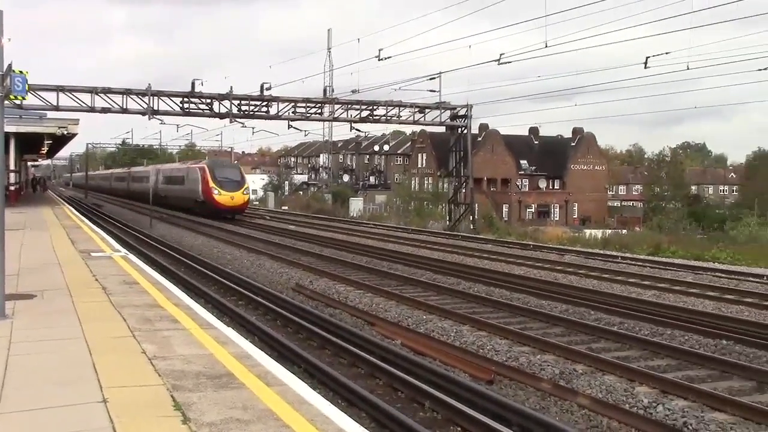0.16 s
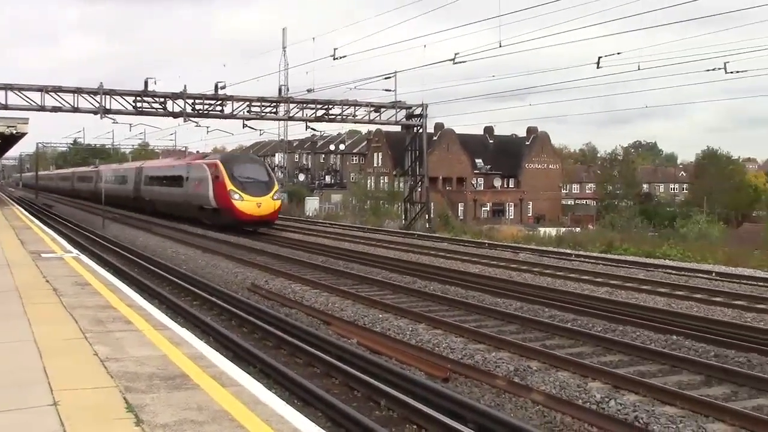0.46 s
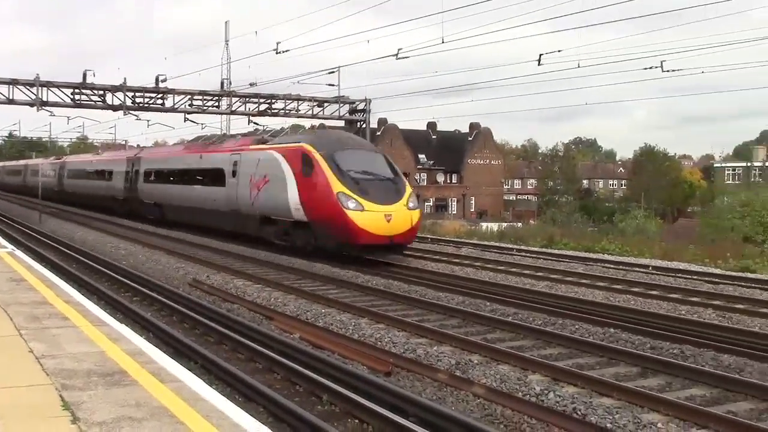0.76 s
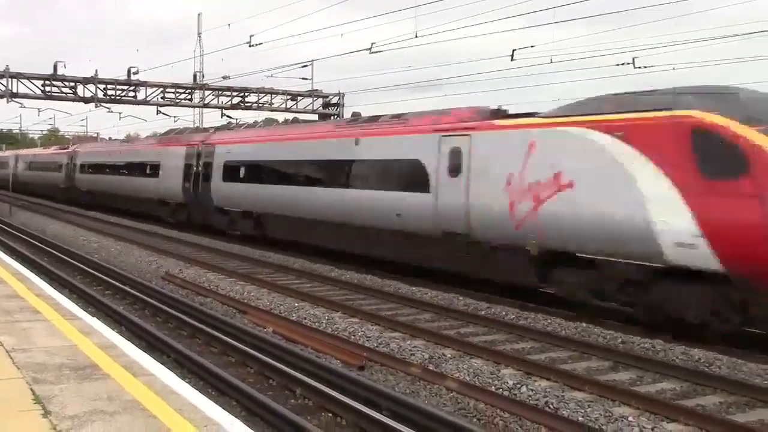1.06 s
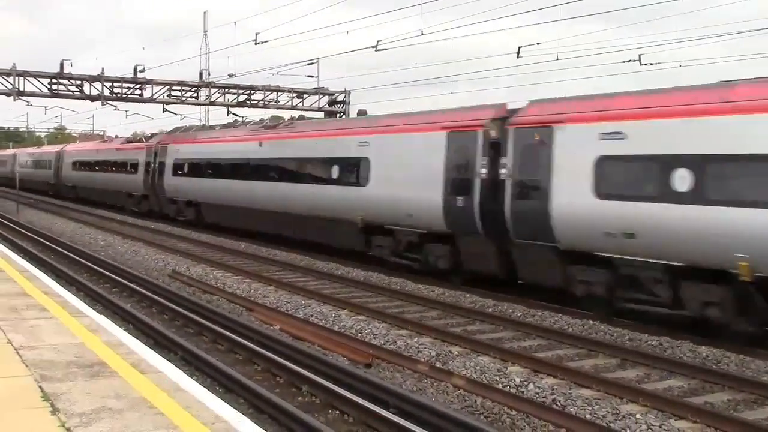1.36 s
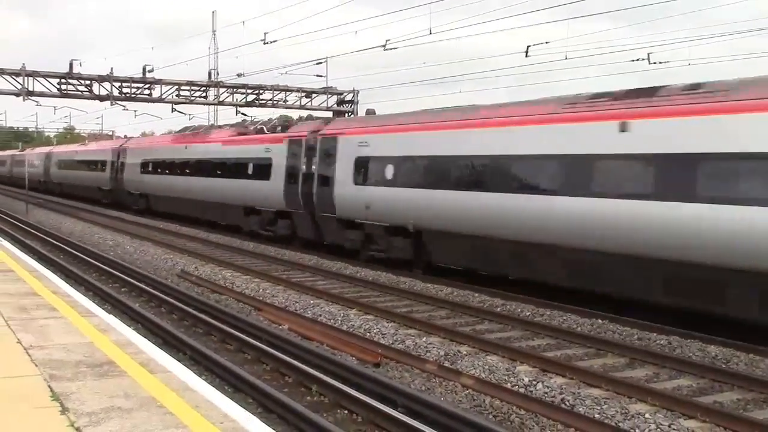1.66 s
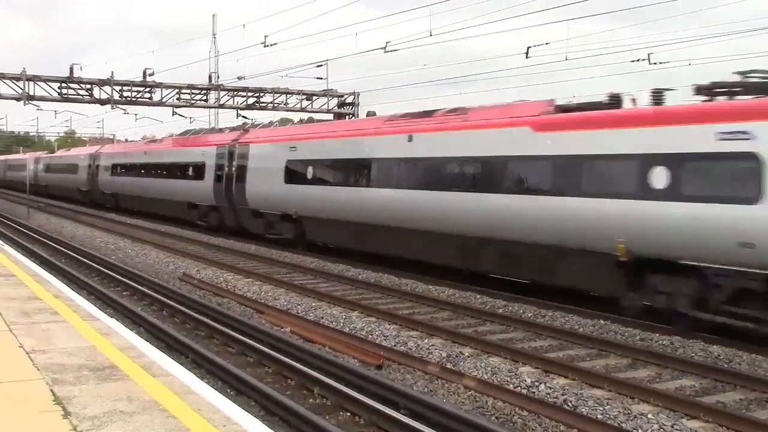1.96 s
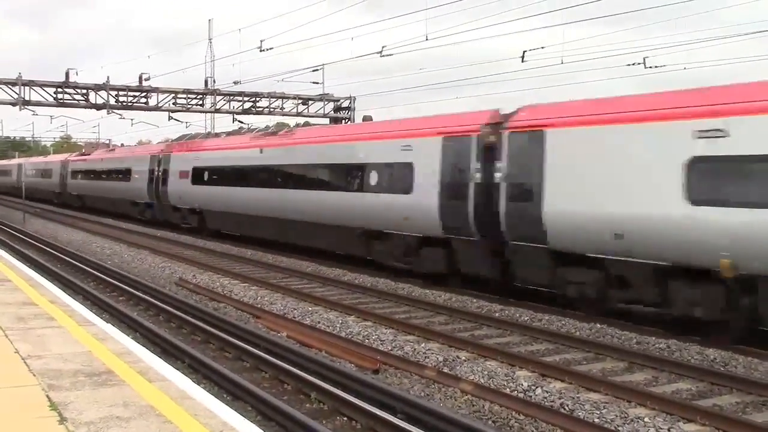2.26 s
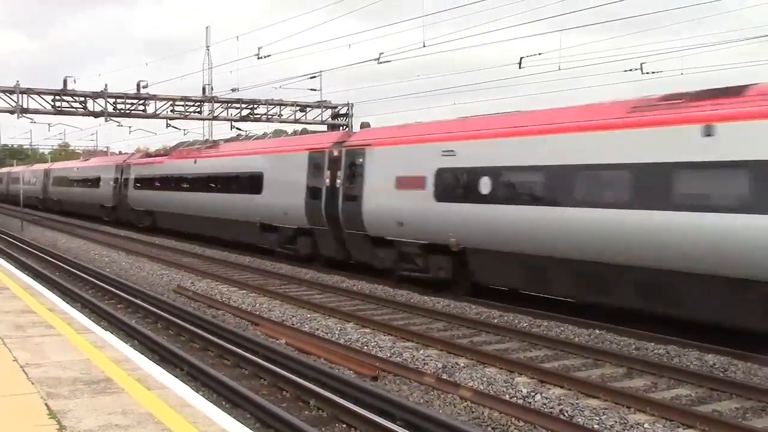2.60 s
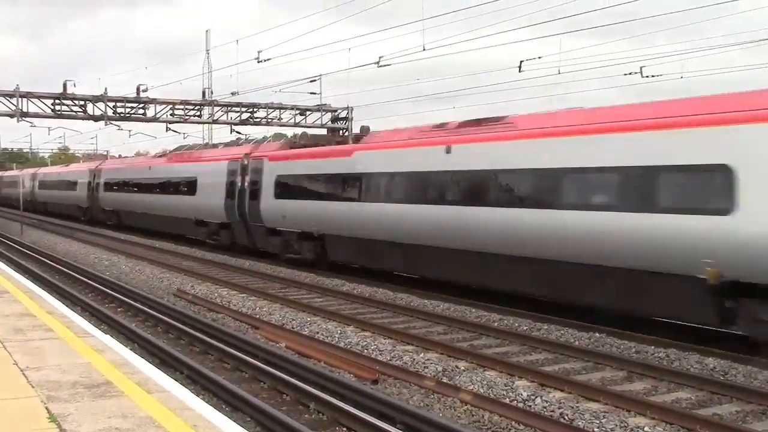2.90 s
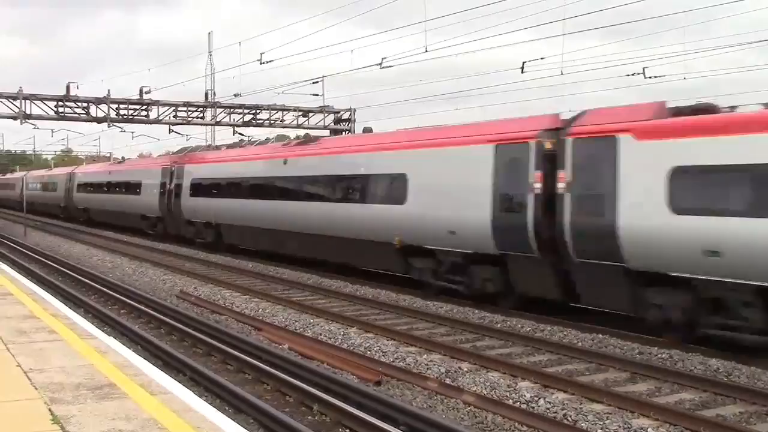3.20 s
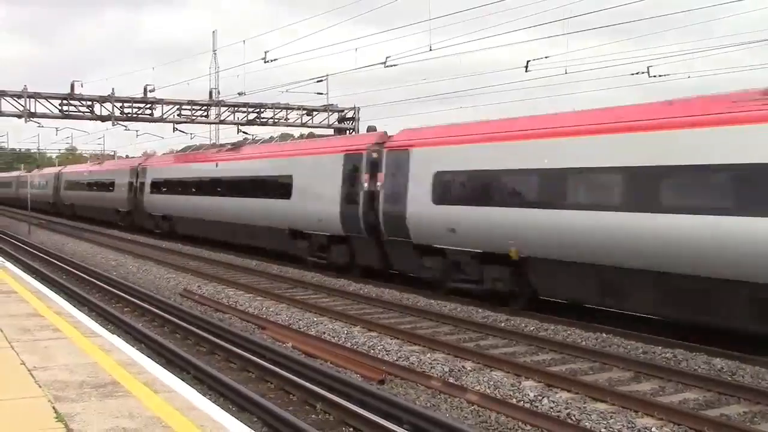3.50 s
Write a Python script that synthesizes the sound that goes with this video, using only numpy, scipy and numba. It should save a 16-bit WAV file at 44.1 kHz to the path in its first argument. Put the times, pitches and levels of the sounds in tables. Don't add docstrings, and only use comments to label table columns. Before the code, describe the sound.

Fast electric train rushes close past a station platform, rails ringing ahead, wheels singing and hissing

```python
import sys
import numpy as np
from scipy import signal
from scipy.fft import rfft, irfft
from scipy.io import wavfile
from scipy.ndimage import uniform_filter1d, minimum_filter1d
from numba import njit

SR = 44100
rng = np.random.default_rng(int(sys.argv[2]) if len(sys.argv) > 2 else 0)


def boost_factor(decibels):
    exponent = np.asarray(decibels, float) / 20
    return 10 ** exponent


def to_wav(s):
    ch = np.atleast_2d(s).T
    pcm = np.round(np.clip(ch, -1, 1) * 32767)
    wavfile.write(sys.argv[1], SR, pcm.astype(np.int16))


N = 160965

# pitch in Hz, level in dB, width in Hz, end in seconds.
SQUEAL = (6662, -36.5, 219, .3)
# pitch in Hz, level in dB, width in Hz.
RAIL_AHEAD = [(2536, -32, 24), (2824, -22.5, 200), (1884, -22, 200), (986, -22, 230), (1600, -26, 140),
              (246, -30.5, 123)]
# pitch in Hz, level in dB, width in Hz.
RAIL_HIGH = [(10207, -60, 70), (11150, -64, 40), (12091, -60, 25), (13010, -60, 25)]
# pitch in Hz, level in dB, width in Hz.
RAIL_UNDER = [(950, -29, 22), (1883, -22.5, 12.5), (1704, -30, 15), (233.6, -38.5, 32), (289, -40.5, 49)]
# frequency in Hz, density in dB per Hz.
AIR = [(30, -39.5), (280, -4.5), (420, -9), (900, -1.5), (1500, -5.5), (3300, -9), (5000, -21), (7000, -16),
       (15000, -34)]
# time abreast in seconds, pitch in Hz, level in dB, width in Hz,
# loss along the track ahead in dB, loss behind in dB.
WHISTLES = [
    (1.24, 5880, -35, 90, -7, 80),
    (1.68, 6170, -29.5, 90, 900, 194),
    (1.84, 4300, -30, 90, 298, 40),
    (2.17, 4170, -35, 120, 502, 50),
]
# time abreast in seconds, levels of overtones 1, 2 and 3 in dB, level of hiss in dB.
BOGIES = [(1.30, -12, -3.5, 1, -17), (1.615, -6.5, -3.5, 1, 4.5), (1.755, -4, -1.5, -0.5, 5),
          (2.065, -2.5, -2, 5, 1), (2.20, -5, -1, 1, -4), (2.535, 2.5, 0.5, 3.5, 0),
          (2.67, -1.5, -6.5, -2, -14), (2.955, 0.5, -2, -2, -2), (3.11, -7, -5, 4.5, -20),
          (3.395, 1, -2, 4, 3), (3.535, 0.5, -0.5, 3.5, -2), (3.85, 2.5, -21, -18, 7.5),
          (3.99, 5.5, -26, 7, 8), (4.30, 6, -26, 4, 5), (4.44, -7, -1, -1, 5)]
# level in dB, width in Hz, halo level in dB, halo width in Hz,
# loss along the track ahead in dB, loss behind in dB.
SONG = [
    (-26.5, 45, -27, 300, -2.5, 2.5),
    (-25.5, 31.4, -21, 145, 1, -0.5),
    (-20.5, 46, -24.5, 510, 11, 22),
]
# frequency in Hz, density in dB per Hz.
ROAR = [(30, -43.5), (230, -9), (420, -15), (950, -8), (1350, -17.5), (3000, -8.5), (5200, -30),
        (6800, -28), (15000, -44)]
# frequency in Hz, density in dB per Hz.
HISS = [(2500, -32), (4000, -6), (5300, -4), (6800, 1.5), (10000, -12), (13000, -18), (15000, -14)]
# frequency in Hz, share in dB.
SPREAD_EARLY = [(400, -43), (2000, -15.5), (3300, -22), (5500, -37), (7000, -8), (8700, -16), (11000, 0),
                (15000, -7)]
SPREAD_LATE = [(400, -29.5), (2000, -11.5), (4000, -12), (5000, -10), (6500, -7.5), (8700, -19),
               (11000, -1), (15000, -11)]
# time in seconds, gain in dB.
GAIN = [(0, 0.5), (.45, 0), (.9, -1), (1.3, 2.5), (1.8, -2), (2.3, -1), (2.8, -2), (3.2, -2.5),
        (3.36, -8.5), (3.65, -11.5)]
# frequency in Hz, response in dB.
MIC_TOP = [(10000, 0), (13000, -2), (15000, -5)]

SPEED_M_S, TRACK_M, AXLES_M = 45.5, 8.3, 2.6
SOUND_M_S = 343
AHEAD_ENDS_S = 1.126
NOSE_S, AIR_REACH_M = 1.0, 11
AIR_DB, AIR_FLICKER_DB = -11.5, 1.84
RIPPLE_HZ, REAR_AXLE_DB, SONG_FLUTTER_DB = 914.1, -4.5, 2.5
ROAR_DB, ROAR_FLICKER_DB = -14.5, 1.56
HISS_DB, HISS_FLICKER_DB = -34, 1.5
PAN_DB, PORT_LAG_DB, SIDE_LOW_HZ = 4, -15, 505
AIM = 0.95
WIDENS_S = 1.09
RUMBLE_CUT_HZ = 28


@njit
def svf(x, hz, width):
    y, b, l = np.empty(len(x)), 0., 0.
    for i in range(len(x)):
        g, k = np.tan(np.pi * hz[i] / SR), width / hz[i]
        v = (b + g * (x[i] - l)) / (1 + g * (g + k))
        b, l, y[i] = 2 * v - b, l + 2 * g * v, k * v
    return y


def unit(x):
    return x / np.sqrt(np.mean(x ** 2))


def band(hz, width_hz):
    hz = hz + np.zeros(N)
    once = svf(rng.standard_normal(N), hz, 1. * width_hz)
    return unit(svf(once, hz, 1. * width_hz))


def walk(rate):
    hold = int(SR / rate)
    steps = np.repeat(rng.standard_normal(N // hold + 1), hold)
    return 1.37 * uniform_filter1d(uniform_filter1d(steps, hold), hold)[:N]


def fade(at_s, over_s):
    return 1 / (1 + np.exp((np.arange(N) / SR - at_s) / over_s))


def response(f, shape):
    hz, db = np.transpose(shape)
    return boost_factor(np.interp(np.log(f), np.log(hz), db))


def shaped(x, shape):
    f = np.fft.rfftfreq(N, 1 / SR) + 1
    return irfft(rfft(x) * response(f, shape), N)


def coloured(shape, flicker_db):
    f = np.fft.rfftfreq(N, 1 / SR) + 1
    spec = rfft(rng.standard_normal(N)) * response(f, shape)
    sway = walk(4.95)
    place = 2 * np.log2(np.clip(f, 20, 20480) / 20)
    out = 0
    for k in range(21):
        flicker = boost_factor(flicker_db * (walk(8.954) + 0.52 * sway))
        out = out + flicker * irfft(spec * np.clip(1 - abs(place - k), 0, 1), N)
    return unit(out)


def passing(abreast_s, reach_m=TRACK_M):
    along = SPEED_M_S * (np.arange(N) / SR - abreast_s)
    bearing = along / np.hypot(along, reach_m)
    doppler = 1 / (1 + bearing * SPEED_M_S / SOUND_M_S)
    return doppler, np.sqrt(1 - bearing ** 2), bearing


def beam(bearing, ahead_db, behind_db):
    return boost_factor(-np.where(bearing < 0, ahead_db * bearing ** 6, behind_db * bearing ** 2))


def rail_squeal():
    hz, db, wide, ends_s = SQUEAL
    return boost_factor(db) * band(hz, wide) * fade(ends_s, 0.023)


def rails_ahead():
    _, nose, _ = passing(NOSE_S, AIR_REACH_M)
    swell = sum(boost_factor(db + 5.5 + 1.8 * walk(7.6)) * band(hz, wide) for hz, db, wide in RAIL_AHEAD)
    high = sum(boost_factor(db + walk(8)) * band(hz, wide) for hz, db, wide in RAIL_HIGH)
    return (swell * nose ** 1.32 + high) * fade(AHEAD_ENDS_S, 0.098)


def nose_air():
    _, close, bearing = passing(NOSE_S, AIR_REACH_M)
    return boost_factor(AIR_DB) * close * beam(bearing, 1, 8.5) * coloured(AIR, AIR_FLICKER_DB)


def whistles():
    mid, side = 0, 0
    for abreast_s, hz, db, wide, ahead, behind in WHISTLES:
        shift, close, bearing = passing(abreast_s)
        level = boost_factor(db + 1.5 * walk(8.5)) * close * beam(bearing, ahead, behind)
        whistle = level * band(hz * shift, wide)
        mid, side = mid + whistle, side + whistle * (bearing + AIM)
    return mid, side


def wheel_song():
    mid, side = 0, 0
    for abreast_s, *overtone_dbs, _ in BOGIES:
        for rear in (0, 1):
            shift, close, bearing = passing(abreast_s + rear * AXLES_M / SPEED_M_S)
            song = 0
            for k, (db, wide, halo_db, halo_wide, ahead, behind) in enumerate(SONG):
                hz = (k + 1) * RIPPLE_HZ * shift
                tone = boost_factor(db + rear * REAR_AXLE_DB + SONG_FLUTTER_DB * walk(14)) * band(hz, wide)
                if rear:
                    tone = tone + boost_factor(halo_db) * band(hz, halo_wide)
                song = song + boost_factor(overtone_dbs[k]) * beam(bearing, ahead, behind) * close * tone
            mid, side = mid + song, side + song * (bearing + AIM)
    return mid, side


def axles_near():
    near = 0
    for abreast_s, *_ in BOGIES:
        for rear in (0, 1):
            _, close, _ = passing(abreast_s + rear * AXLES_M / SPEED_M_S)
            near = near + close ** 2
    return np.sqrt(near / near.max())


def rails_under(near):
    low = sum(boost_factor(db + 2 * walk(6.92)) * band(hz, wide) for hz, db, wide in RAIL_UNDER)
    return low * near ** 0.66


def rolling_roar(near):
    return boost_factor(ROAR_DB) * near * coloured(ROAR, ROAR_FLICKER_DB)


def bogie_hiss():
    power = 0
    for abreast_s, *_, hiss_db in BOGIES:
        _, close, bearing = passing(abreast_s + AXLES_M / SPEED_M_S)
        power = power + (boost_factor(hiss_db) * close * beam(bearing, 5.1, 25)) ** 2
    return boost_factor(HISS_DB) * np.sqrt(power) * coloured(HISS, HISS_FLICKER_DB)


def rush_of_train(near):
    return nose_air() + rolling_roar(near) + bogie_hiss()


def scene():
    near = axles_near()
    wheel_mid, wheel_side = wheel_song()
    whistle_mid, whistle_side = whistles()
    rush = rush_of_train(near) + rail_squeal() + rails_ahead() + rails_under(near)
    mid = wheel_mid + whistle_mid + rush

    other = rush_of_train(near)
    early = fade(WIDENS_S, 0.026)
    spread = early * shaped(other, SPREAD_EARLY) + (1 - early) * shaped(other, SPREAD_LATE)
    aside = wheel_side + whistle_side + 0.5 * (1 - early) * shaped(rush, [(4000, -2), (8000, 2)])

    side = spread - (boost_factor(PAN_DB / 2) - 1) / 2 * aside - boost_factor(PORT_LAG_DB) * np.gradient(aside)
    side = signal.sosfilt(signal.butter(4, SIDE_LOW_HZ, "high", fs=SR, output="sos"), side)
    gain = boost_factor(np.interp(np.arange(N) / SR, *np.transpose(GAIN)))
    return gain * (mid + side * np.array([[1], [-1]]))


def band_limit(x):
    return signal.sosfilt(signal.butter(12, 15410, fs=SR, output="sos"), x)


def record(dry):
    rumble_cut = signal.butter(2, RUMBLE_CUT_HZ, "high", fs=SR, output="sos")
    dry = signal.sosfilt(rumble_cut, shaped(dry, MIC_TOP))
    peak = -minimum_filter1d(-np.abs(dry).max(axis=0), size=64)
    peak = uniform_filter1d(peak, size=64)
    return band_limit(dry * np.minimum(1, 0.9 / (peak + 1e-9)))


dry = scene()
out = record(dry)
to_wav(out)
```